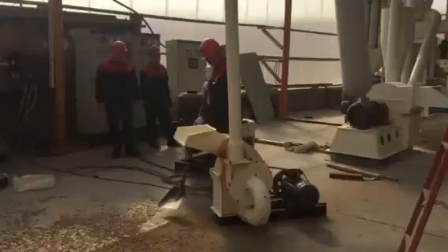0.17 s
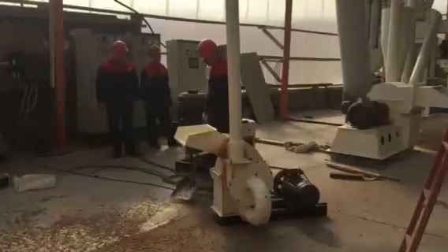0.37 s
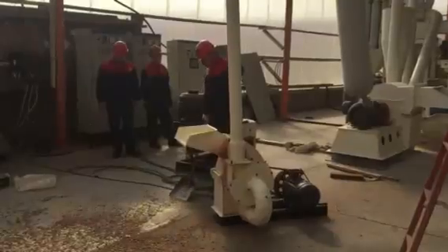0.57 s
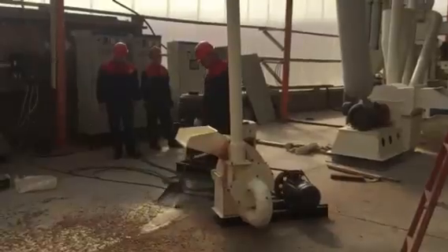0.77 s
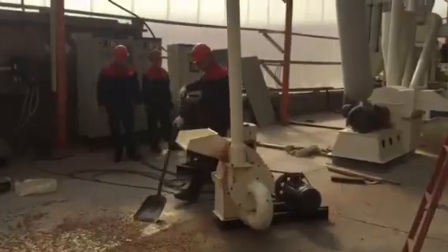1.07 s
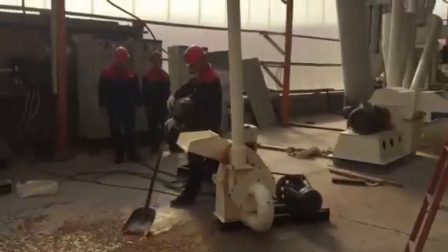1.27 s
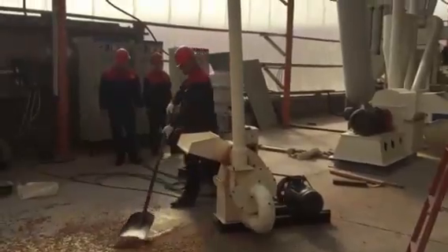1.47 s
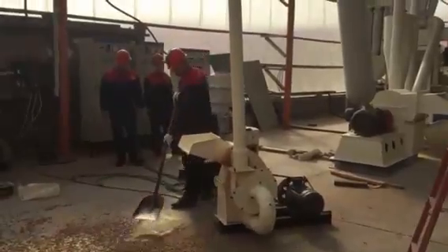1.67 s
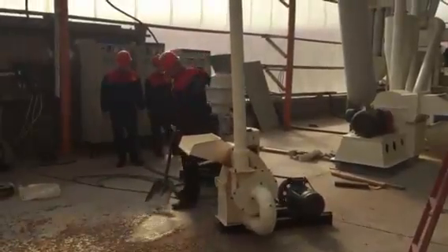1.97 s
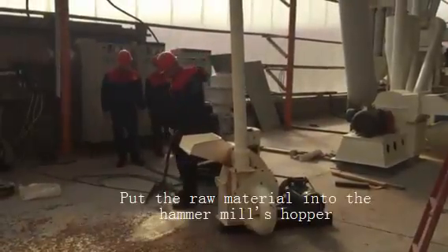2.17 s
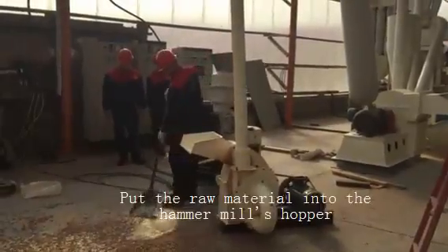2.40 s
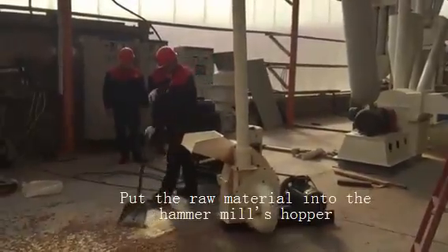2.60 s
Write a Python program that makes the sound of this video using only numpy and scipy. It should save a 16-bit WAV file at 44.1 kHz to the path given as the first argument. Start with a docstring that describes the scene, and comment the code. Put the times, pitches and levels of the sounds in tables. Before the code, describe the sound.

A hammer mill roars steadily in a workshop, with whining bearing, hissing air and shovel clanks

```python
"""Empty hammer mill

A belt-driven hammer mill runs empty in a large workshop, heard by one microphone with a quick fade-in.
Rotor and six-blade fan drone in sines at multiples of the shaft speed; belt, motor and frame add hums.
A worn ball bearing buzzes in throbbing sines in the steel casing, with thin whines beside its tones.
Air roars and hisses as filtered noise with fine clicks of grit; a shovel clanks in short, fading sines.
"""
import sys
import numpy as np
from scipy import signal
from scipy.fft import rfft, irfft, next_fast_len
from scipy.io import wavfile
from scipy.ndimage import uniform_filter1d, map_coordinates

SR = 44100
rng = np.random.default_rng(int(sys.argv[2]) if len(sys.argv) > 2 else 0)


def wav_out(sig):
    """Save sig, one row per channel (or a flat mono array), as 16-bit PCM at SR to the path in sys.argv[1]."""
    wavfile.write(sys.argv[1], SR, np.round(np.clip(np.atleast_2d(sig).T, -1, 1) * 32767).astype(np.int16))


def voltage_ratio(level):
    """Linear amplitude factor for a level in decibels (scalar or array-like)."""
    return 10 ** (np.asarray(level, float) / 20)


N = 120834  # length in samples

# Rotor speed: (time [s], turns per second [Hz])
SHAFT_SPEED = [(0, 67.14), (1.2, 67.16), (2.74, 67.19)]
# Rotor, hammers and fan blades, before the rotor's overall gain:
# (multiple of shaft speed [1], rms level [dB], unsteadiness [dB])
ROTOR_ORDERS = [(1, -35.6, .7), (2, -36.4, 1), (3, -34, 2), (5, -42, 2), (6, -26.2, 1), (8, -50, 2),
                (9, -41.5, 1.5), (10, -43.5, 2.5), (11, -48, 2), (12, -27.3, .8), (13, -48, 2),
                (16, -45, 2.5), (18, -39, 2), (21, -48, 2), (24, -37.5, 2.5), (42, -46, 2.5)]
# Strength of the twelfth shaft multiple, used relative to its mean: (time [s], level [dB])
BLADE_SWELL = [(0.1, -31.5), (0.9, -30.5), (1.7, -30), (2.15, -27.5), (2.74, -26.5)]
# Hums of drive belt, motor and frame, before their overall gain: (frequency [Hz], rms level [dB])
DRIVE_HUMS = [(48.67, -55), (91.76, -42.5), (121.4, -50), (158.8, -36.5), (177.1, -45), (183.2, -45),
              (207.9, -43), (226, -47), (250.5, -42), (263.3, -45), (293, -46), (366.8, -44), (483.6, -44),
              (551, -45), (3533.4, -44), (3866.6, -48)]
# Thin whines beside the bearing's tones, coloured by the casing, before their wavering:
# (frequency [Hz], rms level [dB])
BEARING_SIDE_WHINES = [(456.5, -46), (1102.7, -41), (1425, -47), (1636, -47), (1680, -46), (1722, -46),
                       (1919, -46), (1975, -45), (2012, -46), (2200, -47), (2365, -42), (2471, -44),
                       (2757, -47), (3373, -51), (3750, -52), (3900, -51), (3950, -53), (5090, -56)]
# Ball passes heard through the casing, before throb and overall gain:
# (multiple of ball-pass rate [1], rms level [dB])
BALL_PASSES = [(1, -36), (2, -45), (3, -37.5), (4, -38), (5, -34.5), (6, -35), (7, -45), (9, -52)]
# Beating of the bearing's sixth multiple, near 2.3 kHz, used relative to its mean:
# (time [s], level [dB])
BEARING_BEAT = [(0.15, -36.5), (0.25, -45), (0.35, -34), (0.82, -33.5), (0.87, -45), (1.11, -29.5),
                (1.35, -43.5), (1.38, -25.5), (1.64, -52), (1.72, -27.5), (2.05, -43), (2.17, -26),
                (2.29, -42), (2.53, -25), (2.62, -40), (2.7, -33)]
# Air flow through the casing; the roar follows part of its rise and fall: (time [s], level [dB])
AIR_FLOW = [(0.1, -25), (0.82, -23.5), (0.83, -24.5), (1.14, -23.5), (1.37, -20), (1.39, -14), (1.49, -22),
            (2.22, -24), (2.35, -23), (2.37, -22), (2.66, -20), (2.74, -18)]
# Tone colour of the roar: (frequency [Hz], relative level [dB])
ROAR_COLOUR = [(10, -24), (25, -24), (45, -11.5), (60, -22), (78, -7), (110, -4), (160, -7), (270, 0),
               (340, -3), (420, -4), (600, -3.5), (760, -8), (850, -5), (1050, -2), (1320, -6),
               (1650, -4.5), (2100, -3), (2400, -2.5), (2620, -6), (2800, -6), (3050, -10), (3400, -11.5),
               (3850, -16), (4200, -18.5), (7000, -18), (12000, -46)]
# Hiss of air and grit, before its fast wavering: (time [s], level [dB])
HISS_LEVEL = [(0.1, -23.5), (0.17, -25.5), (0.25, -22.5), (0.27, -26.5), (0.36, -24.5), (0.39, -21),
              (0.42, -24.5), (0.88, -27.5), (0.91, -20), (0.92, -28.5), (0.94, -22), (0.97, -28.5),
              (0.98, -25), (1.06, -28), (1.09, -23), (1.13, -29), (1.14, -24.5), (1.39, -23), (2.02, -29),
              (2.15, -27), (2.2, -29), (2.21, -23), (2.27, -30.5), (2.28, -27), (2.59, -27), (2.62, -23),
              (2.72, -26.5), (2.74, -21)]
# Tone colour of the hiss: (frequency [Hz], relative level [dB])
HISS_COLOUR = [(2240, -20), (3800, 1.5), (4300, -0.5), (4900, -3.5), (5200, -1.5), (6610, -1), (9060, 0.5),
               (10000, -1), (10400, -3.5), (10800, -1), (12500, -2), (14000, -2), (16500, -5)]
# Shovel clanks: (time [s], gain [dB])
CLANKS = [(1.372, -25), (1.405, -19.5), (2.372, -21), (2.397, -18)]
# Ways the shovel blade rings, varied at random for each clank:
# (frequency [Hz], starting level [dB], time to fall by 60 dB [s])
SHOVEL_MODES = [(1180, -5, .12), (1643, -9, 0.12), (1990, 2.5, 0.096), (2240, -11, 0.1), (2310, -4, 0.17),
                (2960, -6, 0.093), (3590, -4, 0.062)]
# Quick fade-in: (time [s], gain [dB])
FADE_IN = [(0.034, -78), (0.04, -34), (0.059, -23), (0.063, -11), (0.072, -3.5), (0.08, -1)]


def unit(x):
    """Scale a sound to an rms of 1."""
    return x / np.sqrt(np.mean(x ** 2) + 1e-20)


def curve(rows):
    """Join (time [s], value) rows by straight lines, one value per sample."""
    times, values = np.transpose(rows)
    return np.interp(np.arange(N) / SR, times, values)


def wobble(rate):
    """Draw a smooth random curve through `rate` random points a second."""
    points = rng.standard_normal(int(N * rate / SR) + 4)
    return map_coordinates(points, [np.arange(N) * rate / SR])


def turns(hz):
    """Add up a fixed or moving frequency into a phase in radians."""
    return 2 * np.pi * np.cumsum(hz * np.ones(N)) / SR


def tone(phase, db):
    """Make a sine of the given rms level with a random starting phase."""
    start = rng.uniform(0, 2 * np.pi)
    return np.sqrt(2) * voltage_ratio(db) * np.sin(phase + start)


def coloured(x, colour):
    """Shape a sound's spectrum with (frequency [Hz], level [dB]) rows, then scale it to rms 1."""
    size = next_fast_len(N + 8192)
    hz, db = np.transpose(colour)
    bins_hz = np.fft.rfftfreq(size, 1 / SR)
    gain = voltage_ratio(np.interp(np.log(bins_hz + 1), np.log(hz + 1), db))
    return unit(irfft(rfft(x, size) * gain, size)[:N])


def patchy(patchy_db):
    """Make white noise with patches of random gain in time and frequency."""
    spectrum = signal.stft(rng.standard_normal(N + 512), nperseg=512)[2]
    patches = uniform_filter1d(rng.standard_normal(spectrum.shape), size=5, axis=0)
    patches = uniform_filter1d(patches, size=8, axis=1)
    return signal.istft(spectrum * voltage_ratio(patchy_db * unit(patches)), nperseg=512)[1][:N]


def rotor():
    """Rotor and fan sound at multiples of the shaft speed, each wavering; the twelfth swells slowly."""
    phase = turns(curve(SHAFT_SPEED))
    blades_db = curve(BLADE_SWELL)
    swell_db = blades_db - blades_db.mean()
    out = np.zeros(N)
    for multiple, db, waver_db in ROTOR_ORDERS:
        level_db = db + waver_db * wobble(4.99) + swell_db * (multiple == 12)
        out += tone(multiple * phase, level_db)
    return out


def drive_and_whines():
    """Belt, motor and frame hum at fixed pitches with wavering levels; thin whines waver in both."""
    gain_db, waver_db = -1.1, 3  # for the hums
    out = np.zeros(N)
    for hz, db in DRIVE_HUMS:
        out += tone(turns(hz), db + gain_db + waver_db * wobble(3))
    for hz, db in BEARING_SIDE_WHINES:
        phase = turns(hz + 1.57 * wobble(3.99))
        out += tone(phase, db + 2 * wobble(4.1))
    return out


def bearing():
    """Balls pass at a slightly slipping rate, throbbing with shaft and cage; the sixth multiple beats."""
    ball_hz, slip_hz, cage_hz = 389.6, .15, 28
    shaft_depth, cage_depth, waver_db = .3, .2, 1
    phase = turns(ball_hz + slip_hz * wobble(2.47))
    beat_db = curve(BEARING_BEAT)
    swell_db = beat_db - beat_db.mean()
    shaft_throb = 1 + shaft_depth * np.sin(turns(curve(SHAFT_SPEED)))
    cage_throb = 1 + cage_depth * np.sin(turns(cage_hz + .5 * wobble(1.9)))
    buzz = np.zeros(N)
    for multiple, db in BALL_PASSES:
        level_db = db + waver_db * wobble(5.07) + swell_db * (multiple == 6)
        buzz += tone(multiple * phase, level_db)
    return shaft_throb * cage_throb * buzz


def hall(x):
    """Nearby walls and steelwork answer with a fading noise echo that combs the spectrum finely."""
    t60_s, echo_db = .4, -11
    t = np.arange(SR // 3) / SR
    tail = rng.standard_normal(len(t)) * voltage_ratio(-60 * t / t60_s)
    echo = signal.fftconvolve(x, tail / np.linalg.norm(tail))[:len(x)]
    return unit(x + voltage_ratio(echo_db) * echo)


def roar():
    """Turbulent air in the resonant casing and the hall's rumble: coloured noise that follows the flow."""
    roar_db, follow_share = -21.5, 0.38
    flow_db = curve(AIR_FLOW)
    level_db = roar_db + follow_share * (flow_db - flow_db.mean())
    return voltage_ratio(level_db) * coloured(hall(patchy(patchy_db=1.93)), ROAR_COLOUR)


def hiss():
    """Air hisses as patchy noise, with fine grit ticking in the casing as random clicks."""
    grit_per_s, grit_spread_db, grit_db = 3000, 2.5, -8  # grit_db is relative to the air
    count = int(grit_per_s * N / SR)
    when, chance = rng.random((count, 2)).T
    # Most clicks are weak, a few much stronger
    clicks = voltage_ratio(-grit_spread_db * np.log(1 - chance)) * rng.choice([-1, 1], count)
    grit = np.bincount((when * N).astype(int), clicks, N)
    air = unit(patchy(patchy_db=1.17)) + voltage_ratio(grit_db) * unit(grit)
    level_db = curve(HISS_LEVEL) + 1.0 * wobble(40.15)
    return voltage_ratio(level_db) * coloured(air, HISS_COLOUR)


def shovel():
    """Each clank shakes the blade's ringing modes, which start fast and die away."""
    level_spread_db, pitch_spread, attack_s = 3.7, 0.0237, 0.0012  # pitch spread is a fraction
    out = np.zeros(N + SR)
    t = np.arange(SR // 4) / SR
    for start_s, clank_db in CLANKS:
        ring = np.zeros(len(t))
        for hz, db, t60_s in SHOVEL_MODES:
            fading_db = db + rng.normal(0, level_spread_db) - 60 * t / t60_s
            mode_hz = hz * (1 + pitch_spread * rng.normal())
            ring += voltage_ratio(fading_db) * np.sin(2 * np.pi * mode_hz * t)
        out[round(start_s * SR):][:len(t)] += voltage_ratio(clank_db) * ring * (1 - np.exp(-t / attack_s))
    return out[:N]


def scene():
    """Add all sources at the one microphone and copy the sum to both channels."""
    rotor_db, bearing_db = 1.35, 1.55  # overall gains
    mono = voltage_ratio(rotor_db) * rotor() + drive_and_whines() + voltage_ratio(bearing_db) * bearing()
    mono = mono + roar() + hiss() + shovel()
    return np.array([mono, mono])


def low_pass(x):
    """Removes everything above the highest recorded frequency."""
    return signal.sosfilt(signal.butter(12, 16550, fs=SR, output="sos"), x)


def record(dry):
    """Round peaks softly, fade in quickly and remove everything above the band limit."""
    ceiling, knee, top_hz = .6, 4, 15300  # a higher knee bends more sharply
    soft = dry / (1 + np.abs(dry / ceiling) ** knee) ** (1 / knee)
    faded = soft * voltage_ratio(curve(FADE_IN))
    size = next_fast_len(N + 8192)
    passes = np.fft.rfftfreq(size, 1 / SR) < top_hz
    mix = irfft(rfft(faded, size) * passes, size)[:, :N]
    return low_pass(mix)


dry = scene()
out = record(dry)
wav_out(out)
```